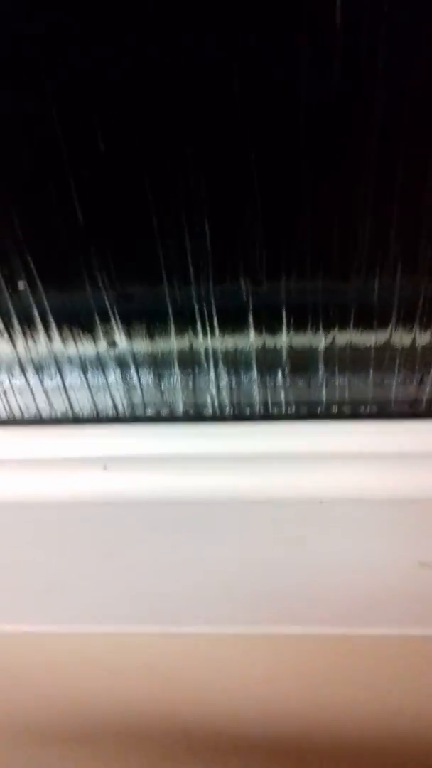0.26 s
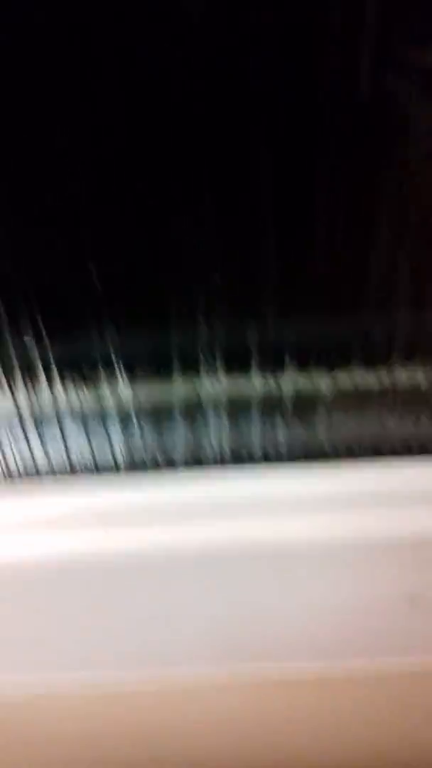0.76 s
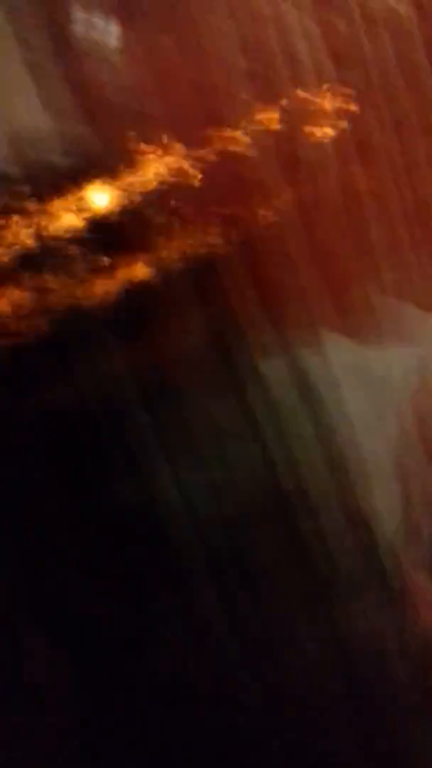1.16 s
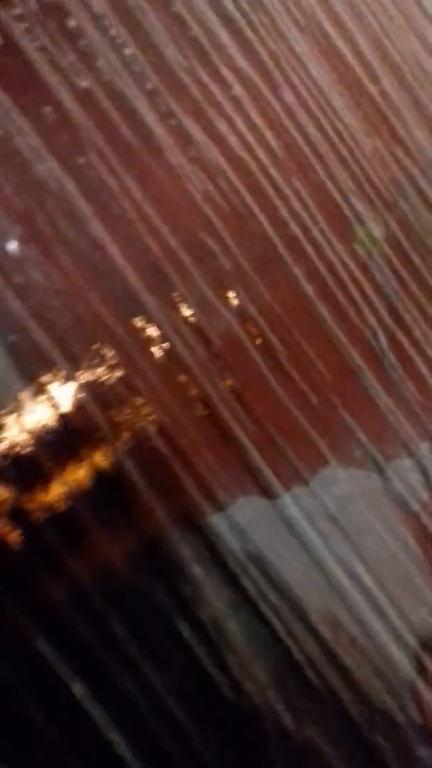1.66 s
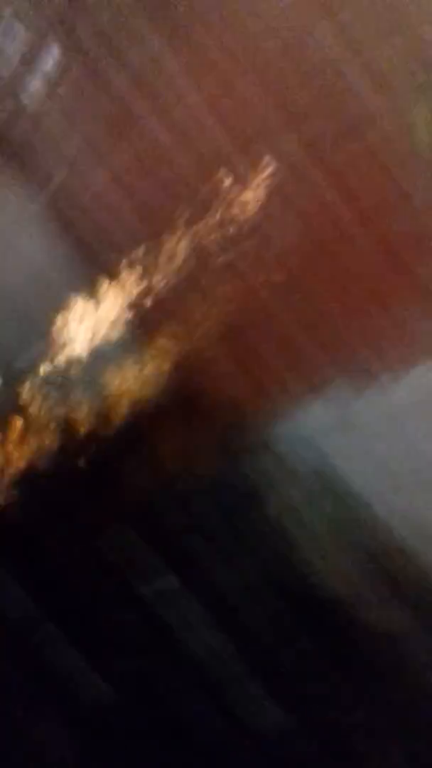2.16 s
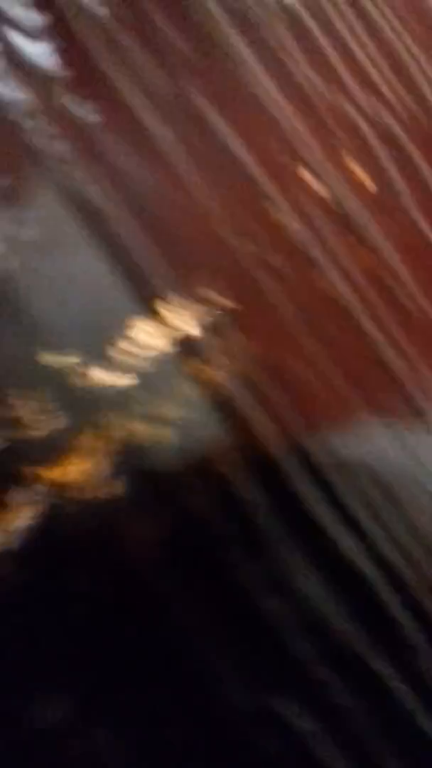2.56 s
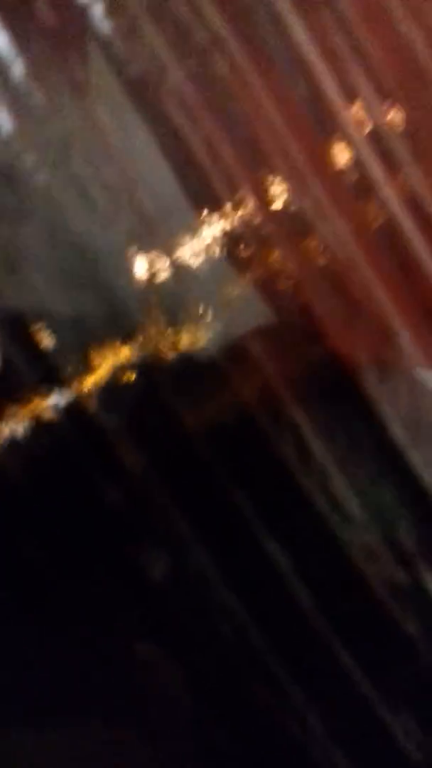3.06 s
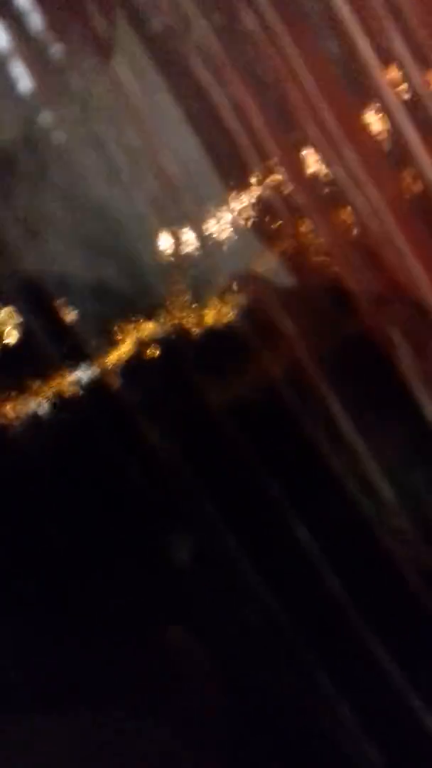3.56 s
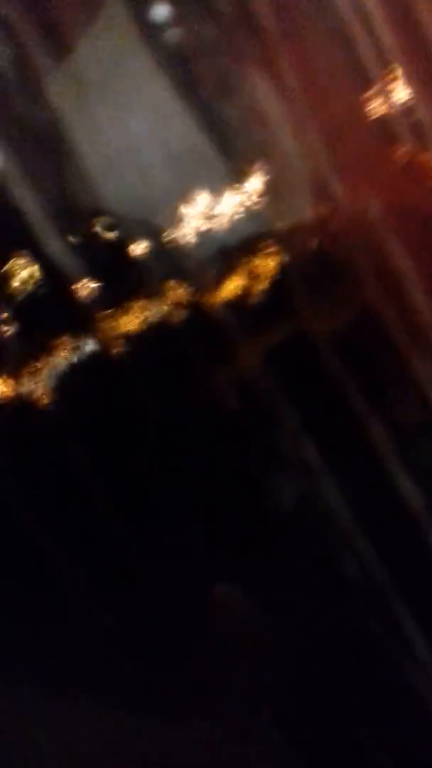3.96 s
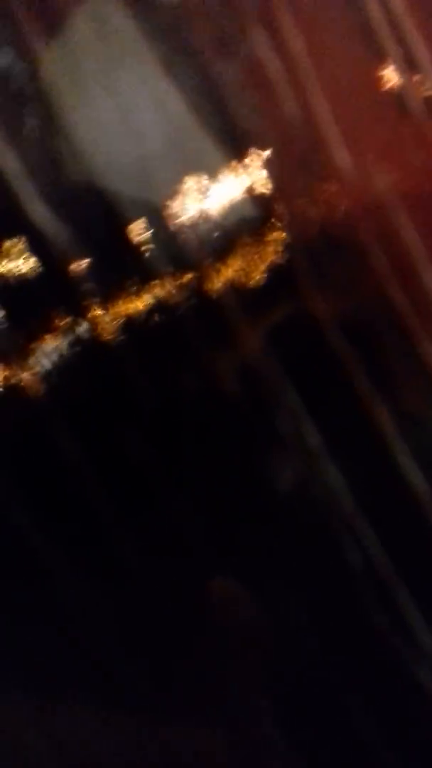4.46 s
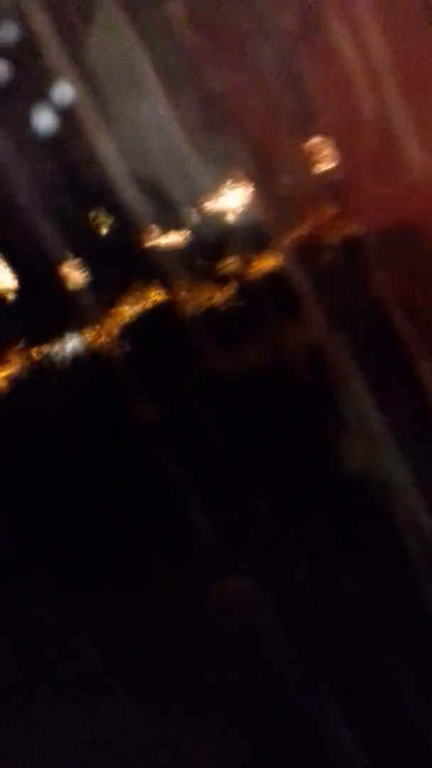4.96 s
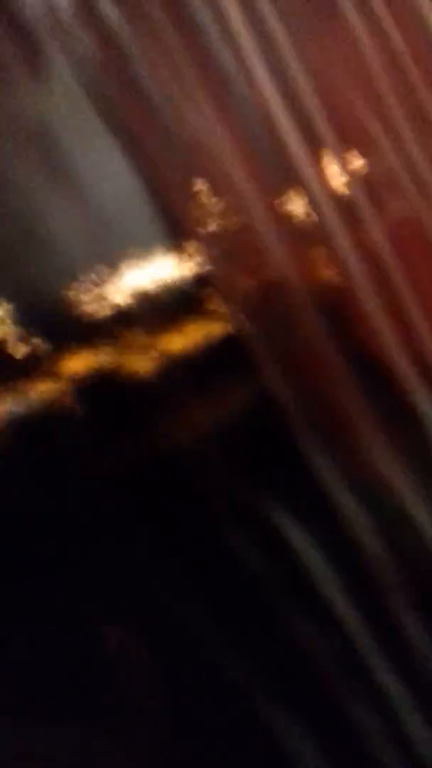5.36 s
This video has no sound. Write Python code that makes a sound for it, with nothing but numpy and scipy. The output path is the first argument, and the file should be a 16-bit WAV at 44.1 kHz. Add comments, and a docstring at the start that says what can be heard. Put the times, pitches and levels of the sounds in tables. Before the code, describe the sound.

Metal keys rattle and click in a hand close to the microphone, sparse and quiet at first, then a busy loud jangle over faint hiss.

```python
"""Keys handled close to a phone

A bunch of keys is worked right beside the microphone: dry, hand-damped clicks with short rattles, sparse
at first and then busy, each a burst of noise through resonances of metal, held bunch and microphone port.
Sliding grains scrape between them, one key rings free as dying sines, and the grip thuds as low noise.
A short diffuse echo follows; quiet air hiss, filtered noise, lies nearly the same left and right."""
import sys
import numpy as np
from scipy import signal
from scipy.fft import rfft, irfft
from scipy.io import wavfile
from scipy.ndimage import uniform_filter1d

SR = 44100
rng = np.random.default_rng(int(sys.argv[2]) if len(sys.argv) > 2 else 0)


def transcribe(u):
    """Save the signal u as a 16-bit wav file named by the first command-line argument.

    u: samples, shape (n,) or (channels, n), limited to [-1, 1]; the rate is SR.
    q: integer samples, one column per channel.
    """
    v = np.clip(np.atleast_2d(u).T, -1, 1)
    q = np.round(v * 32767).astype(np.int16)
    wavfile.write(sys.argv[1], SR, q)


N = 247401

# What a blow sounds like close up: resonances of the key blades, with the microphone port's own peak
# near 4.1 kHz. Each row: frequency in Hz, width of a single pass in Hz, gain in dB.
BLADE = [(2932, 1060, 6), (3415, 254, 11.5), (4133, 814, 15), (5160, 110, 3)]
# The brighter ring of a blow. Each row: frequency in Hz, width of a single pass in Hz, gain in dB.
RING = [(6070, 2500, 22), (6582, 1070, 25), (7830, 1700, 3.5)]
# The topmost tick of a blow. Each row: frequency in Hz, width of a single pass in Hz, gain in dB.
TICK = [(8790, 350, 3), (10950, 1360, 1.5), (11950, 2000, 1.5), (14800, 2900, -17)]
# The hand-held body of the bunch. Each row: frequency in Hz, width of a single pass in Hz, gain in dB.
KNOCK = [(385, 690, -2.5), (644, 457, 1.5), (999, 514, 1.5), (1327, 560, -3), (2350, 1600, -7)]


def undb(db):
    """Decibels to gain."""
    return 10 ** (np.asarray(db) / 20)


def level(x, db):
    """Set the rms level."""
    return x * undb(db) / np.sqrt(np.mean(x ** 2))


def fade(t, t60):
    """Decay that loses 60 dB in t60 seconds."""
    return np.exp(-np.log(1000) * t / t60)


def resonate(x, modes, order=3):
    """Pass x through a sum of (Hz, width, dB) resonances, each applied `order` times."""
    f = np.fft.rfftfreq(len(x), 1 / SR)
    gain = 0
    for hz, width, db in modes:
        single_pass = 1j * f * width / (hz ** 2 - f ** 2 + 1j * f * width)
        gain = gain + undb(db) * single_pass ** order
    return irfft(rfft(x) * gain, len(x))


def coloured(spectrum, db):
    """Noise shaped by a (Hz, dB) spectrum and set to an rms level in dB."""
    hz, shape = np.transpose(spectrum)
    f = np.maximum(np.fft.rfftfreq(N, 1 / SR), 1)
    gain = undb(np.interp(np.log(f), np.log(hz), shape))
    return level(irfft(rfft(rng.standard_normal(N)) * gain, N), db)


def grains(size, spread_db):
    """Tiny contacts of very unequal strength."""
    return rng.standard_normal(size) * undb(spread_db * rng.exponential(size=size))


def add(track, x, s):
    """Mix x into the track at second s."""
    i = int(s * SR)
    track[i:i + len(x)] += x[:len(track) - i]


def air():
    """Hiss shared by both channels and hiss that differs, with a low murmur strongest at both ends."""
    # Spectrum of the shared hiss. Each row: frequency in Hz, relative density in dB.
    shared_spectrum = [(25, -26), (60, -16), (130, -9), (350, -1.5), (600, -7), (1500, -9), (3000, -19.5),
                       (4100, -8.5), (5000, -32), (6800, -35), (8500, -32), (10000, -32.5), (12500, -31.5),
                       (16000, -35)]
    # Spectrum of the hiss unlike in the two channels. Each row: frequency in Hz, relative density in dB.
    apart_spectrum = [(18, -33), (30, -10), (252, -8), (2230, -14), (3980, -22.5), (6550, -22),
                      (16000, -21.5)]
    # How the background moves. Each row: time in seconds, low murmur in dB, all hiss in dB.
    swell = [(0, 13, -6), (.5, 3, -4), (1.0, 0, 0.9), (3.0, 3.5, -0.2), (5.61, 13, -1.1)]
    s, *columns = np.transpose(swell)
    murmur, overall = (undb(np.interp(np.arange(N) / SR, s, db)) for db in columns)
    hiss = coloured(shared_spectrum, -60)
    low = signal.sosfilt(signal.butter(1, 500, fs=SR, output="sos"), hiss)
    shared = hiss + low * (murmur - 1)
    return overall * shared, overall * coloured(apart_spectrum, -72)


def scrape(flicker_db=2.0, slide_ring_db=-22, knock_db=1.5, ticks_per_s=320, tick_share_db=-11):
    """Dense grains of sliding metal, and stray little ticks, ring the same parts as the clicks."""
    # How busily the hand works the bunch. Each row: time in seconds, slide in dB, stray ticks in dB.
    busyness = [(0, -87, -83), (.55, -68, -94), (.7, -55.5, -65), (1.0, -57.5, -106), (1.35, -62, -101),
                (1.7, -63, -89), (2.0, -86, -90), (2.85, -66, -131), (3.3, -70, -56), (3.6, -62, -80),
                (3.901, -55, -66), (4.18, -70, -100), (4.3, -54, -69), (4.651, -53.5, -62), (4.9, -49, -69),
                (5.3, -52, -60), (5.5, -55.5, -74)]
    # Longer slides that swell and fade.
    # Each row: centre in seconds, nominal half length in seconds, blade in dB, knock in dB.
    slides = [(0, 0.018, -53.5, -51.5), (0.066, 0.026, -54.5, -49.5), (0.168, 0.0093, -85, -56),
              (0.229, 0.041, -59.5, -51.5), (0.737, 0.038, -81, -53), (0.903, 0.022, -48.5, -58),
              (1.152, 0.025, -45.5, -50.5), (1.418, 0.062, -54, -60), (1.536, 0.042, -39, -34.5),
              (2.232, 0.06, -58.5, -66), (3.352, 0.028, -38.5, -55), (3.367, 0.063, -59, -46),
              (3.768, 0.017, -44, -43), (3.897, 0.01, -43, -55), (4.893, 0.014, -32, -24.5),
              (5.088, 0.0071, -41, -51)]
    t = np.arange(N) / SR
    s, *columns = np.transpose(busyness)
    blade, stray = (undb(np.interp(t, s, db)) for db in columns)
    knock = blade * undb(knock_db)
    for mid, half, blade_db, body_db in slides:
        side = np.where(t < mid, 0.75 * half, 1.2 * half)  # bites quickly, lets go slowly
        swell = np.exp(-((t - mid) / side) ** 2)
        blade = blade + undb(blade_db) * swell
        knock = knock + undb(body_db) * swell

    hold = SR // 90  # samples between fresh values of the flicker
    steps = np.repeat(rng.standard_normal(N // hold + 1), hold)[:N]
    slip = uniform_filter1d(steps, hold)
    rub = grains(N, 1.5) * undb(flicker_db * slip)

    ticks = grains(N, 1.8) * (rng.random(N) < ticks_per_s / SR)
    burst = rng.standard_normal(400) * fade(np.arange(400) / SR, 0.012)
    ticks = signal.fftconvolve(ticks, burst)[:N]

    rasp = BLADE + [(2623, 990, 3.5), (5170, 4500, -35.5)]  # a dragged edge also rasps lower down
    parts = [(rub, rasp, blade), (rub, KNOCK[2:], knock), (rub, RING, blade * undb(slide_ring_db)),
             (ticks, BLADE, stray), (ticks, RING, stray), (ticks, TICK, stray * undb(tick_share_db))]
    return sum(level(resonate(x, modes), 0) * gain for x, modes, gain in parts)


def handled(modes):
    """Scatter pitch and gain: the fingers load the keys differently at every blow."""
    return [(hz * (1 + .03 * rng.standard_normal()), width, db + 3.5 * rng.standard_normal())
            for hz, width, db in modes]


def struck(rattle, first):
    """Put the first contact in front, sized against the energy of the rattle."""
    return np.r_[first * np.sqrt(np.sum(rattle ** 2)), rattle[1:]]


def clicks(bounce_db=4.5, knock_rise_s=0.024):
    """Each click: a sharp first contact and a dying, bouncing rattle, heard through four sets of resonances."""
    # Key clicks. Each row: start in seconds, blade peak in dB, knock rms minus blade peak in dB,
    # ring rms minus blade peak in dB, rattle t60 in seconds.
    events = [(0.044, -37.5, -9, -31, 0.045), (0.2059, -37, -14.5, -38, 0.03),
              (0.2137, -31.5, -12.5, -42, 0.075), (0.2305, -42, -5, -24, 0.041),
              (0.3015, -43.5, -17, -29, 0.079), (0.576, -31.5, -15.5, -25, 0.049),
              (0.631, -37, -9.5, -22, 0.06), (0.6497, -38.5, -10, -15, 0.039),
              (0.6825, -32, -13, -13, 0.058), (0.709, -35, -6.5, -42, 0.057),
              (0.7507, -31.5, -25, -21.5, 0.061), (0.7827, -34.5, -10, -18.5, 0.099),
              (1.1264, -34.5, -15, -36, 0.092), (1.2792, -47, -9.5, -47, 0.045),
              (1.3012, -41.5, 1.5, -55, 0.037), (1.3602, -44, -2.5, -47, 0.1), (1.6519, -42, 6, -59, 0.047),
              (1.9612, -56.5, 2.5, -37, 0.033), (2.1004, -26.5, -5.5, -34, 0.054),
              (2.1051, -39, -6, -48, 0.054), (2.2623, -42.5, -10.5, -29, 0.049),
              (2.5413, -42.5, -14, -32, 0.077), (2.6084, -47, -5.5, -37, 0.13),
              (2.711, -54.5, 4.5, -41, 0.037), (2.9178, -35.5, -9, -36, 0.063),
              (2.9327, -15.5, -21.5, -32.5, 0.071), (2.967, -27.5, -19.5, -13.5, 0.029),
              (2.9793, -21, -15.5, -21, 0.032), (3.119, -34, -22, -24.5, 0.037),
              (3.1747, -28, -17.5, -16.5, 0.042), (3.1956, -35, -19, -48, 0.045),
              (3.2243, -34.5, -11.5, -24, 0.052), (3.245, -29, -16.5, -10, 0.034),
              (3.2678, -27.5, -13, -37, 0.094), (3.3033, -23.5, -23, -40, 0.037),
              (3.3252, -29, -18, -23, 0.045), (3.3477, -21.5, -15.5, -24, 0.055),
              (3.3624, -18, -14, -16.5, 0.091), (3.4441, -22, -21, -15, 0.07),
              (3.462, -25.5, -17.5, -36, 0.061), (3.484, -15.5, -20.5, -31, 0.045),
              (3.4998, -49, 1.5, -31, 0.023), (3.6421, -31, -35, -23, 0.14),
              (3.6902, -25.5, -11.5, -47, 0.054), (3.6958, -24, -14, -51, 0.032),
              (3.759, -33, -15, -23, 0.034), (3.7711, -21.5, -19, -23, 0.045),
              (3.7813, -20.5, -12.5, -26, 0.055), (3.8476, -38, -20, -15, 0.056),
              (3.8651, -31.5, -20, -16.5, 0.048), (3.8749, -16.5, -16, -45, 0.063),
              (3.8993, -25, -13, -16.5, 0.089), (3.9064, -28, -19, -20.5, 0.045),
              (3.9493, -19, -16.5, -16, 0.058), (3.9976, -30, -24, -23, 0.029),
              (4.036, -31, -13.5, -19, 0.03), (4.0503, -19, -31, -27, 0.06),
              (4.0699, -8.5, -22.5, -26, 0.06), (4.2186, -17, -15, -29, 0.052),
              (4.2671, -31, -4, -20, 0.089), (4.2873, -17.5, -15.5, -13.5, 0.047),
              (4.3733, -20.5, -33, -46, 0.037), (4.381, -29.5, -11, -29, 0.05),
              (4.4278, -22.5, -21, -16.5, 0.067), (4.5046, -34.5, -23, -19.5, 0.02),
              (4.5163, -21, -23.5, -40, 0.093), (4.5731, -27, -37, -20, 0.065),
              (4.6194, -26.5, -22, -45, 0.023), (4.6818, -22, -22, -33, 0.076),
              (4.6892, -22, -22, -17.5, 0.045), (4.7077, -17.5, -11, -21, 0.05),
              (4.7139, -7.5, -27.5, -58, 0.051), (4.7272, -24, -19, -46, 0.07),
              (4.7531, -14, -31.5, -38, 0.084), (4.7918, -24, -16, -25, 0.034),
              (4.8, -24.5, -13, -13.5, 0.04), (4.8106, -21.5, -18.5, -40, 0.028),
              (4.8209, -12.5, -22.5, -48, 0.033), (4.8485, -29.5, -13, -24, 0.045),
              (4.8593, -21, -25, -28, 0.073), (4.8867, -5, -18.5, -31, 0.062),
              (4.8906, -4.5, -26, -31, 0.031), (4.9262, -34, -2.5, -11.5, 0.045),
              (4.9438, -22, -17, -31, 0.039), (4.956, -18.5, -16, -26, 0.037),
              (4.995, -19.5, -16, -27.5, 0.085), (5.0403, -17, -16, -31, 0.042),
              (5.0508, -17, -19, -26, 0.087), (5.0774, -23, -20, -19, 0.045),
              (5.0898, -16.5, -19, -25, 0.037), (5.1016, -26, -37, -15, 0.035),
              (5.1516, -25.5, -17, -16.5, 0.038), (5.1741, -25, -14, -44, 0.055),
              (5.1823, -18.5, -21, -17, 0.036), (5.2278, -11.5, -29, -23.5, 0.067),
              (5.2369, -28.5, -12.5, -8.5, 0.038), (5.255, -22, -31, -14.5, 0.065),
              (5.262, -19.5, -18.5, -21, 0.063), (5.3149, -26, -23.5, -19.5, 0.07),
              (5.3607, -16.5, -26.5, -23.5, 0.067), (5.4326, -26.5, -17, -20, 0.096),
              (5.546, -14.5, -14.5, -23, 0.047), (5.5991, -28.5, -14, -12.5, 0.039)]
    cupped_until_s = 2.8  # cupped in the hand at first: less sparkle, a higher knock
    knock_scatter, tick_scatter_db = .25, 4  # from blow to blow
    tick_follows = .65  # harder contacts brighten ring and tick together
    out, t = np.zeros(N), np.arange(8192) / SR
    onset = SR // 70  # samples over which the rms is set
    soft = np.hanning(12)
    late = 1 - 1.2 * fade(t, knock_rise_s)  # the heavy parts take a moment to move
    for s, db, knock_db, ring_db, t60 in events:
        cupped = s < cupped_until_s
        pitch_chance, tick_chance = rng.standard_normal(2)
        knock_hz = (1770 if cupped else 1300) * np.exp(knock_scatter * pitch_chance)
        tick_db = -23.5 + (-12 if cupped else 0)
        tick_db += tick_follows * ring_db + tick_scatter_db * tick_chance

        bounces = np.repeat(rng.standard_normal(128), 64)
        rattle = grains(len(t), 2.51) * undb(bounce_db * bounces)
        knock_modes = KNOCK + [(knock_hz, 1.2 * knock_hz, 3)]
        # each part: resonances, decay of the rattle, strength of the first contact
        parts = [(BLADE, fade(t, t60), 1.14),
                 (knock_modes, late * fade(t, t60 * 1.5), 1.1),
                 (RING, fade(t, t60 * 1.23), 0.91),
                 (TICK, fade(t, t60 * 1.1), 0.8)]
        blade, knock, ring, tick = (resonate(struck(rattle * shape, first), handled(modes))
                                    for modes, shape, first in parts)
        knock = np.convolve(knock, soft)  # the body is pushed more softly than the blades
        add(out, blade / np.abs(blade).max() * undb(db), s)
        for x, part_db in [(knock, knock_db), (ring, ring_db), (tick, tick_db)]:
            add(out, x / x[:onset].std() * undb(db + part_db), s)
    return out


def free_key(start_s=.755, base_db=-57.5):
    """One key rings undamped: its partials are sines that die away separately."""
    # Partials of the free key: frequency in Hz.
    partial_hz = [3537, 4974, 6250, 8600, 9900, 11200, 13250, 14900]
    # Each row, one for each partial: level above the base in dB, t60 in seconds.
    partials = [(9, 0.89), (13.5, 0.2), (3, 0.31), (-4, 0.055), (-3, 0.09), (-1, 0.05), (-7, 0.15),
                (0, 0.08)]
    out, t = np.zeros(N), np.arange(SR // 2) / SR
    for hz, (db, t60) in zip(partial_hz, partials):
        add(out, undb(base_db + db) * np.sin(2 * np.pi * hz * t) * fade(t, t60), start_s)
    return out


def thuds():
    """The hand shifts its grip: soft-edged bursts of noise through one broad low resonance."""
    # Grip thuds. Each row: start in seconds, peak in dB, frequency in Hz, t60 of the noise in seconds.
    events = [(0.831, -45.5, 207, 0.23), (2.106, -41, 152, 0.25), (2.719, -55.5, 182, 1),
              (4.89, -34.5, 332, 0.24), (5.545, -25, 343, 0.029)]
    out, t = np.zeros(N), np.arange(SR // 2) / SR
    for s, db, hz, t60 in events:
        push = rng.standard_normal(len(t)) * fade(t, t60) * (1 - fade(t, .015))
        thud = resonate(push, [(hz, hz / 1.8, 0)])
        add(out, undb(db) * thud / np.abs(thud).max(), s)
    return out


def echo(keys, t60_s=0.48, echo_db=-18.5):
    """Nearby surfaces answer the keys with a short diffuse tail of decaying noise."""
    t = np.arange(SR // 2) / SR
    tail = rng.standard_normal(len(t)) * fade(t, t60_s) * (1 - fade(t, 0.024))
    tail /= np.sqrt(np.sum(tail ** 2))
    return undb(echo_db) * signal.fftconvolve(keys, tail)[:N]


def scene():
    """Keys in the middle, hiss around them."""
    shared, apart = air()
    keys = clicks() + free_key() + thuds()
    mid = keys + echo(keys) + scrape() + shared
    return np.array([mid + apart, mid - apart])


def record(dry):
    """The microphone port dips near 10 kHz and the phone cuts the top."""
    notch_hz, notch_width_hz, notch_depth = 10100, 900, .75  # depth: share of the band taken out
    top_hz = 16300
    band = signal.lfilter(*signal.iirpeak(notch_hz, notch_hz / notch_width_hz, fs=SR), dry)
    low_pass = signal.ellip(10, .2, 80, top_hz, fs=SR, output="sos")
    return signal.sosfilt(low_pass, dry - notch_depth * band)


dry = scene()
out = record(dry)
transcribe(out)
```